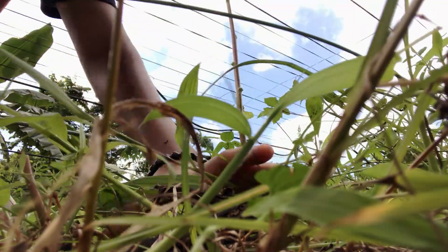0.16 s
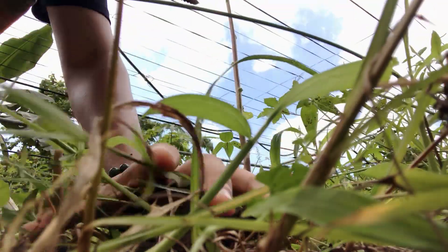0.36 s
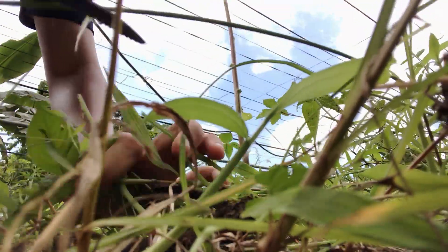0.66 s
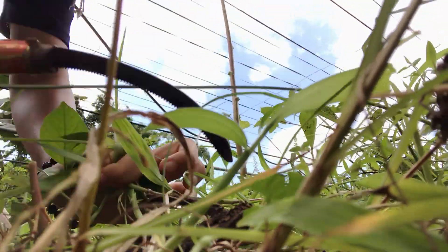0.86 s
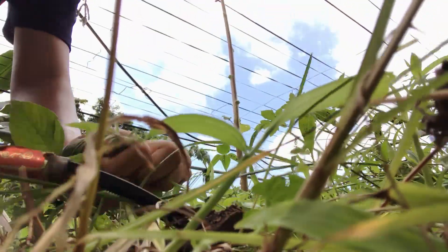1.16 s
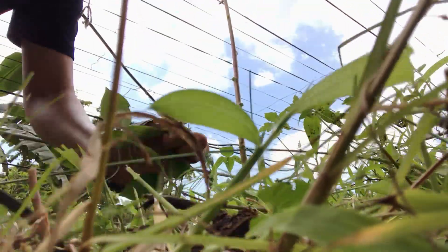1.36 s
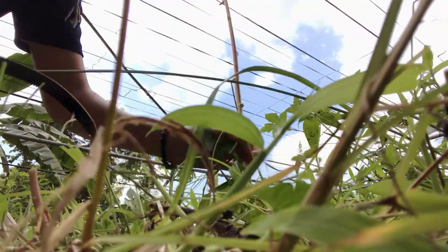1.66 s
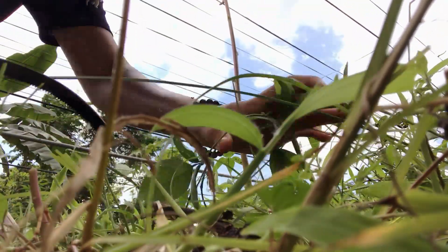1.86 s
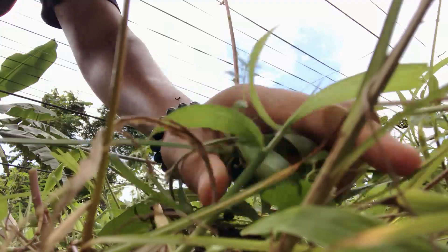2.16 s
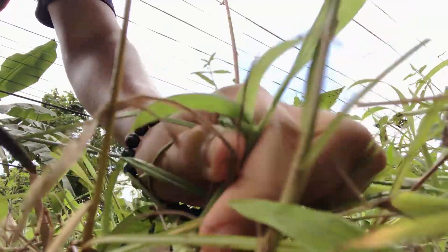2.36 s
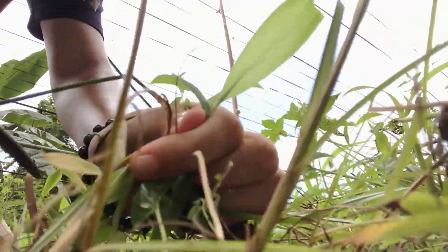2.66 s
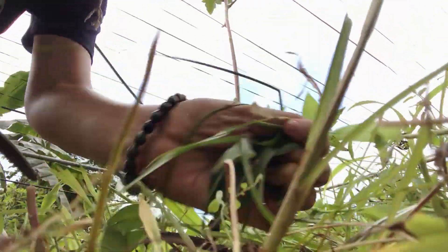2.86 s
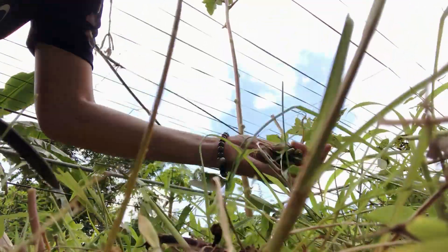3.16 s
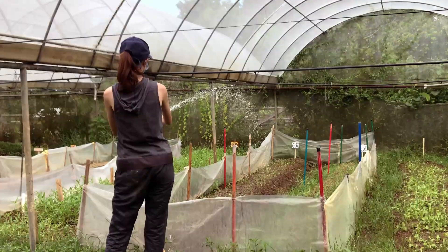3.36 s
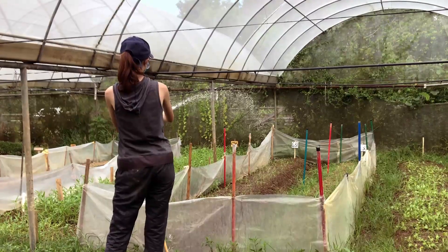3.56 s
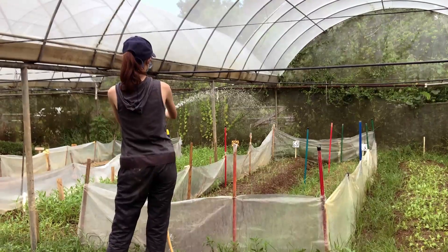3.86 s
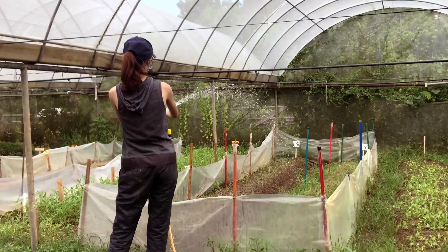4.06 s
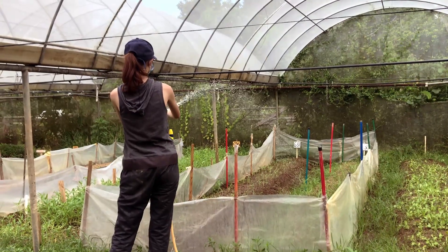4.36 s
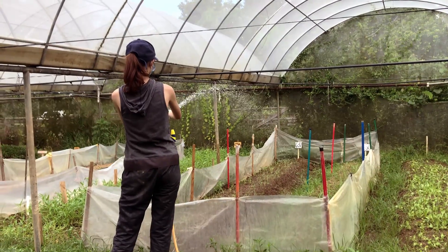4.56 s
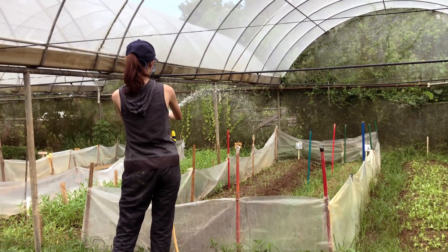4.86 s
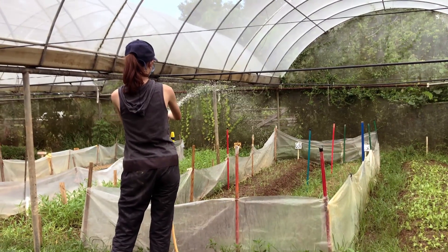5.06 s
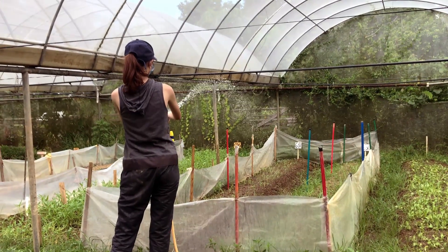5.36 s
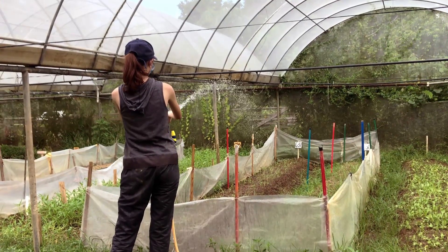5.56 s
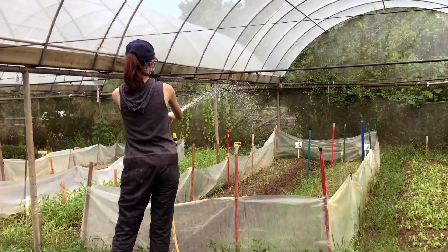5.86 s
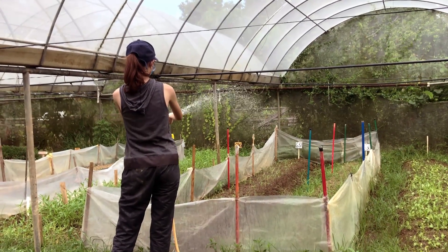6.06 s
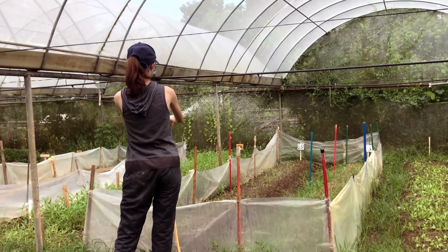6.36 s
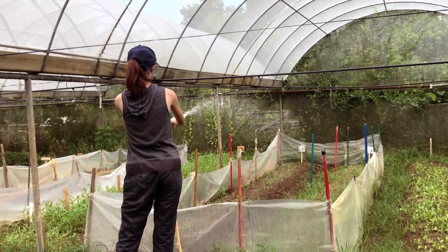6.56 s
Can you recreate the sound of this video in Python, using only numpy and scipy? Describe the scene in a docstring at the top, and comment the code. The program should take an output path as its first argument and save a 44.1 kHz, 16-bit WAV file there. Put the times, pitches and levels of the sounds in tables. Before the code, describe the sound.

A hand pulls weeds right by the microphone, with soft papery rustling, short rips, crisp snaps and a brief blade scrape over a far rumble. An abrupt cut moves to a plastic growing tunnel, where a hose hisses much louder until the end. Drops tick on leaves and sheeting and plop into wet soil, while a motor hums far off and a bird chirps briefly.

```python
"""Leaves rustle close to the ground as a hand gathers, cuts and tears weeds: stalks rip, stems snap,
a sickle scrapes, and insects sizzle faintly over a far rumble. Then the scene cuts, much louder,
to a hose spraying a bed under a plastic tunnel: a patchy hiss, drops ticking on leaves and sheeting,
plops in wet soil, a bird's chirps and the hum of a distant motor. Rustle and spray are noise mixed
with tiny clicks; snaps and drops are cracks with noisy tails; knocks and plops are damped tones."""
import sys
import numpy as np
from scipy import signal
from scipy.fft import rfft, irfft, next_fast_len
from scipy.io import wavfile
from scipy.ndimage import uniform_filter1d, map_coordinates

SR = 44100
rng = np.random.default_rng(int(sys.argv[2]) if len(sys.argv) > 2 else 0)


def waveform_to_disk(signal):
    """Save audio, clipped to [-1, 1], as 16-bit WAV at the path in sys.argv[1]."""
    frames = np.transpose(np.atleast_2d(signal))
    scaled = np.clip(frames, -1, 1) * 32767
    samples = np.round(scaled).astype(np.int16)
    wavfile.write(sys.argv[1], SR, samples)


N = 295911
CUT_S = 3.254  # from the weeds to the hose


def amp(db):
    return 10 ** (np.asarray(db) / 20)


def unit(x):
    return x / np.sqrt(np.mean(x ** 2) + 1e-20)


def curves(rows):
    """Fader moves: one value per sample for each column after the time."""
    times, *columns = np.transpose(rows)
    return [np.interp(np.arange(N) / SR, times, column) for column in columns]


def wobble(rate):
    """A smooth random curve, rate knots a second."""
    return map_coordinates(rng.standard_normal(int(N * rate / SR) + 4), [np.arange(N) * rate / SR])


def coloured(x, spectrum):
    """x through an EQ of (freq_hz, gain_db) points, at rms 1."""
    size = next_fast_len(N + 8192)
    hz, db = np.transpose(spectrum)
    gain = amp(np.interp(np.log(np.fft.rfftfreq(size, 1 / SR) + 1), np.log(hz + 1), db, -120, -120))
    return unit(irfft(rfft(x, size) * gain, size)[:N])


def patchy(x, depth_db, bins, frames):
    """x with patches of random gain in time and frequency."""
    spectra = signal.stft(x, nperseg=256)[2]
    field = uniform_filter1d(rng.standard_normal(spectra.shape), bins, axis=0)
    field = uniform_filter1d(field, frames, axis=1)
    return unit(signal.istft(spectra * amp(depth_db * unit(field)), nperseg=256)[1][:N])


def patter(share, spread_db, patchy_db, clump_db):
    """Patchy noise plus a share of unevenly sized clicks, swelling in clumps."""
    bed = patchy(rng.standard_normal(N), patchy_db, bins=6, frames=8)
    struck = rng.random(N) < .01
    clicks = struck * rng.standard_normal(N) * amp(np.minimum(spread_db * rng.exponential(size=N), 12))
    click_shape = rng.standard_normal(64) * amp(-2 * np.arange(64))
    clicks = signal.fftconvolve(clicks, click_shape)[:N]
    clumps = amp(clump_db * wobble(30))
    clicks = patchy(clicks, 3.5, bins=20, frames=2)
    return clumps * (np.sqrt(1 - share) * bed + np.sqrt(share) * clicks)


def band_levels(peak_db, centre_hz, fall_db, bands_hz):
    """The band nearest the centre gets peak_db; the others lose |fall_db| per octave further out."""
    octaves = np.abs(np.log2(np.asarray(bands_hz) / centre_hz))
    return peak_db - np.abs(fall_db) * (octaves - octaves.min())


def cracks(table, ranges, thump_db, t60_s):
    """Sharp cracks with noisy tails in four bands; a fifth, the ground's thump, follows the first."""
    out, t = np.zeros(N + SR), np.arange(SR // 16) / SR
    bands = [signal.butter(3, edges, "bandpass", fs=SR, output="sos") for edges in ranges]
    middles_hz = np.sqrt(np.prod(ranges[:-1], axis=1))
    for start_s, peak_db, centre_hz, fall_db, tail_db in table:
        crack = rng.standard_normal(len(t)) * amp(-60 * t / .0007)
        noise = rng.standard_normal(len(t))
        fade = amp(np.minimum(tail_db - 3 - 60 * (t - .003) / t60_s, -6))
        peaks_db = band_levels(peak_db, centre_hz, fall_db, middles_hz)
        for band, db in zip(bands, [*peaks_db, peaks_db[0] + thump_db]):
            sharp = signal.sosfilt(band, crack)
            tail = fade * unit(signal.sosfilt(band, noise))
            out[round(start_s * SR):][:len(t)] += amp(db) * (sharp / np.abs(sharp).max() + tail)
    return out[:N]


def rings(table, attack_s):
    """Short damped tones with a soft start."""
    out, t = np.zeros(N + SR), np.arange(SR // 5) / SR
    for start_s, pitch_hz, level_db, t60_s in table:
        envelope = amp(level_db - 60 * t / t60_s) * (1 - np.exp(-t / attack_s))
        out[round(start_s * SR):][:len(t)] += envelope * np.sin(2 * np.pi * pitch_hz * t)
    return out[:N]


# Bands of dragging stems, scraping stalks, leaves and dry blades: centre_hz
PLANT_BANDS = [1000, 3400, 7000, 13000]
def plant_mix(x, gains):
    """x split into four cross-faded bands, each on its own fader."""
    spectrum = rfft(x)
    position = np.interp(np.log(np.fft.rfftfreq(N, 1 / SR) + 1), np.log(PLANT_BANDS), np.arange(4))
    windows = [np.clip(2 - 3 * np.abs(position - k), 0, 1) for k in range(4)]
    return sum(gain * unit(irfft(spectrum * window, N)) for gain, window in zip(gains, windows))


# Faders riding the hand's movement: time_s, leaves_db, stalks_db
HAND_MOVES = [(0.0, -85, -80), (0.16, -76.5, -77), (0.41, -55.5, -62.5), (0.5, -69, -72.5),
              (0.67, -64.5, -70.5), (0.77, -59, -65.5), (1.13, -67, -71.5), (1.18, -64, -70),
              (1.31, -55, -56), (1.38, -47, -50), (1.48, -56, -56), (1.54, -59, -61), (1.66, -58.5, -64.5),
              (1.74, -66.5, -71), (1.86, -71.5, -78), (2.11, -73, -76), (2.3, -65.5, -76),
              (2.46, -58.5, -70.5), (2.56, -58, -67), (2.76, -58.5, -64), (2.92, -61.5, -62.5),
              (3.24, -54.5, -59.5)]
# Bright, papery EQ: freq_hz, gain_db
LEAF_EQ = [(210, -16), (350, -4.5), (385, -9.5), (452, -10.5), (531, -6), (768, -8), (1240, -7),
           (1890, -8.5), (2400, -8), (2600, -7.5), (4940, -5.5), (6290, 4), (10500, -9.5), (15000, -6.5),
           (16200, -18)]
def rustle():
    """Stems, stalks, leaves and dry blades crackle together as the hand moves."""
    leaves_db, stalks_db = curves(HAND_MOVES)
    drag_db = -67.5 + .54 * (stalks_db - stalks_db.mean())  # follows about half the stalks' swing
    crackle = coloured(patter(share=.14, spread_db=2.5, patchy_db=2.2, clump_db=1.1), LEAF_EQ)
    return plant_mix(crackle, amp([drag_db, stalks_db + .5, leaves_db - 2, leaves_db - 3]))


# One narrow, high peak: freq_hz, gain_db
INSECT_EQ = [(6000, -23), (6600, -6), (7000, 20), (7400, -17), (8000, -33)]
def insects():
    """Insects sizzle in a faint, flickering band of noise."""
    return amp(-87 + 1.8 * wobble(23)) * coloured(rng.standard_normal(N), INSECT_EQ)


# Background faders, one for the weeds and one for the tunnel: time_s, level_db
FAR_LEVELS = [
    [(0.0, -68), (1.3, -67), (2.35, -70), (3.24, -64.5)],
    [(3.26, -46.5), (4.3, -45.5), (5.8, -48), (6.2, -46.5), (6.71, -48.5)],
]
# Motor tones as heard in the tunnel: pitch_hz, wander_hz, over_rumble_db
MOTOR_TONES = [(85.7, 4.07, -2.5), (120.2, 3.96, -4.5), (142.8, 1.72, -4), (240, 1.63, -25.5)]
# Low-end EQ: freq_hz, gain_db
RUMBLE_EQ = [(15, -50), (28, -9), (42, -8.5), (70, 1.5), (100, -7.5), (146, -10.5), (155, -25), (180, -11),
             (202, -27), (225, -13.5), (300, -16), (450, -20.5), (600, -50)]
def rumble_and_motor(in_tunnel):
    """Far rumble in both places; the motor's wandering hum stands out only in the tunnel."""
    far_db = np.where(in_tunnel, curves(FAR_LEVELS[1])[0], curves(FAR_LEVELS[0])[0])
    hum = np.zeros(N)
    for pitch_hz, wander_hz, over_rumble_db in MOTOR_TONES:
        gain = amp(over_rumble_db + .54 * wobble(6.8))
        hz = pitch_hz + wander_hz * wobble(8)
        hum += gain * np.sin(2 * np.pi * np.cumsum(hz) / SR)
    rumble = coloured(rng.standard_normal(N), RUMBLE_EQ)
    return amp(far_db) * (rumble + hum * np.where(in_tunnel, 1, amp(-29)))


# Rips and swishes: start_s, length_s, level_db, centre_hz, fall_db_per_octave
TEAR_CUES = [(.31, .065, -58, 7000, 8.5), (.435, 0.016, -64, 4500, 4), (0.534, 0.021, -65.5, 11100, 8),
             (2.273, .035, -65, 7500, 12), (2.323, .025, -61, 7500, 16), (0.386, 0.013, -58, 10000, 4),
             (.665, 0.024, -65.5, 4000, -0.5), (0.826, 0.059, -55.5, 7000, 5.5),
             (1.098, 0.03, -63, 11000, 4), (1.126, 0.028, -52, 3850, 4), (1.163, 0.044, -54, 3400, 8),
             (1.22, 0.017, -62, 4800, 15), (1.26, .034, -61, 6000, 3), (1.292, 0.029, -45.5, 2500, 2.5),
             (1.332, 0.012, -38.5, 3400, 6), (1.366, 0.016, -40, 2000, 0), (1.387, 0.026, -53.5, 1500, 1),
             (1.443, 0.015, -45.5, 3000, 1), (1.461, 0.0078, -33, 3470, 7.5), (1.473, 0.0097, -49, 4500, 5),
             (1.504, 0.06, -55, 4970, 5), (2.408, 0.048, -60, 7500, 10), (2.527, 0.028, -51, 13000, 12),
             (2.602, 0.012, -44.5, 13000, 7), (2.87, 0.0036, -52, 12000, 2.5), (2.9, .074, -50, 9400, 2.5),
             (2.998, 0.02, -57, 5000, 2.5)]
# Gritty midrange EQ: freq_hz, gain_db
TEAR_EQ = [(210, -44), (350, -13), (732, -15.5), (1390, 2), (1890, -5.5), (2860, -3), (4210, -6.5),
           (4490, -8), (5990, -3), (6700, 0), (10500, -14.5), (11800, -8), (16200, -23)]
def tears():
    """Roots and stalks rip, and the hand swishes through leaves, in dense bursts of clicks."""
    bursts = np.zeros((4, N))
    for start_s, length_s, level_db, centre_hz, fall_db in TEAR_CUES:
        progress = np.arange(round(length_s * SR * 1.3)) / (length_s * SR)  # past 1 is the release
        envelope = amp(2 - 4 * progress) * np.clip((1.3 - progress) * 3, 0, 1)
        gains = amp(band_levels(level_db, centre_hz, fall_db, PLANT_BANDS))
        bursts[:, round(start_s * SR):][:, :len(envelope)] += np.outer(gains, envelope)
    grit = coloured(patter(share=.45, spread_db=2, patchy_db=3, clump_db=0), TEAR_EQ)
    return plant_mix(grit, bursts)


# Breaking stems: start_s, peak_db, centre_hz, fall_db_per_octave, relative_tail_db
SNAP_CUES = [(.3252, -47, 8500, 10, -9), (.3954, -46, 9000, 9, -14), (.6699, -51.5, 5000, -3, -11),
             (.8367, -26, 11000, 8, -21), (.8939, -40, 11000, 10, -29), (1.0488, -49, 3000, 1, -22),
             (1.1051, -46, 12000, 5, -11), (1.1287, -35, 3400, 9, -17), (1.1497, -34.5, 5000, 11, -27),
             (1.192, -37, 8000, 5, -23), (1.2014, -40, 4500, 13, -19), (1.2341, -40, 3800, 15, -17),
             (1.2953, -10, 6500, 20.5, -27), (1.3138, -23.5, 12400, 4, -31), (1.3369, -39, 2000, 3, -6),
             (1.3443, -34, 3000, -3, -9), (1.3673, -46, 2000, 0, -16), (1.3743, -23.5, 6530, 3.5, -11.5),
             (1.382, -32, 1350, 9, -23), (1.4021, -27, 6800, 16, -30), (1.4488, -28, 6200, 10, -13),
             (1.4667, -21, 12000, 6, -19.5), (1.5056, -44, 6500, 2.5, -13), (2.1663, -51, 6500, 3.5, -12),
             (2.3427, -44.5, 7500, 29, -14), (2.5381, -36, 12400, 15, -11), (2.5861, -29, 11100, 10, -19),
             (2.6064, -31, 11000, 7.5, -21), (2.6378, -30, 12400, 11, -33), (2.7192, -36, 12400, 14, -25),
             (2.7756, -34, 6050, 3.5, -27), (2.8377, -32.5, 11000, 11, -24), (2.8752, -29, 10000, 14, -38),
             (2.9001, -26, 6500, 3.5, -30), (2.9072, -15.5, 6850, 10, -16), (2.9132, -26, 6540, 24, -28),
             (3.0068, -35.5, 2000, 2.5, -19)]
# Woody, papery, sharp, crisp and thump bands: low_hz, high_hz
SNAP_BANDS = [(800, 2300), (2500, 4600), (5100, 8400), (9800, 15800), (70, 380)]
def snaps():
    """Thick stems break with a dry crack and thump the ground."""
    return cracks(SNAP_CUES, SNAP_BANDS, thump_db=-14.5, t60_s=.017)


# Hollow hits: start_s, pitch_hz, level_db, t60_s
KNOCK_CUES = [(.836, 125, -53, 0.097), (.836, 295, -49.5, 0.043), (1.13, 260, -55, 0.062),
              (1.293, 513, -42, 0.031), (1.366, 1450, -28, 0.023), (1.372, 125, -48, 0.19),
              (1.372, 298, -43.5, 0.036), (2.586, 1500, -35, 0.015), (2.9065, 1310, -12.5, 0.0088),
              (2.9065, 1030, -26, 0.022), (2.9068, 2080, -12, 0.0073), (2.9068, 2700, -25, 0.016),
              (1.4475, 3150, -19.5, 0.013), (2.957, 860, -44, 0.034), (3.10, 422, -52, 0.11),
              (3.13, 420, -54, 0.12)]
def knocks():
    """Stems, tool and ground knock and ring briefly."""
    return rings(KNOCK_CUES, attack_s=.00035)


# One stroke: start_s, length_s, level_db
SICKLE_STROKE = (1.128, 0.082, -59)
# The blade's resonance: freq_hz, gain_db
SICKLE_EQ = [(2100, -38), (2350, -3), (2500, -6), (2700, -8), (3000, -40)]
def sickle():
    """The blade drags along a stalk: grit excites its resonance, fading along the stroke."""
    start_s, length_s, level_db = SICKLE_STROKE
    progress = (np.arange(N) / SR - start_s) / length_s
    stroke = ((progress > 0) & (progress < 1)) * amp(level_db - 4 * np.clip(progress, 0, 1))
    return stroke * coloured(patter(share=.3, spread_db=2, patchy_db=2, clump_db=2), SICKLE_EQ)


# Water faders: time_s, hiss_db, splash_db
SPRAY_LEVELS = [(3.26, -41.5, -46.5), (3.32, -41.5, -46.5), (3.43, -42.5, -45.5), (3.49, -42, -46.5),
                (3.86, -42.5, -48), (4.06, -45.5, -49), (4.35, -46, -47), (4.94, -45, -51.5),
                (5.23, -41.5, -48.5), (5.7, -44, -49.5), (6.03, -42, -49), (6.24, -43, -47.5),
                (6.71, -44, -51)]
# Airy top of the spray: freq_hz, gain_db
HISS_EQ = [(1180, -35), (2000, -3.5), (2760, -7.5), (3500, -3.5), (4210, 0.5), (4840, -3.5), (5470, 0),
           (7630, -3), (8550, -2.5), (10400, -5.5), (12800, -1), (15100, -7), (16200, 0)]
# Wet body of the spray: freq_hz, gain_db
SPLASH_EQ = [(210, -26), (350, -9.5), (560, -3), (1070, -2), (1460, 0), (1710, 0), (1890, -7), (2800, -7.5),
             (3640, -3.5), (6160, -120)]
def hose():
    """Fine spray hisses on leaves under a flickering mist; heavier water splashes on soil."""
    hiss_db, splash_db = curves(SPRAY_LEVELS)
    hiss = coloured(patter(share=.2, spread_db=3, patchy_db=1.3, clump_db=1), HISS_EQ)
    treble = signal.sosfiltfilt(signal.butter(2, 9000, "highpass", fs=SR, output="sos"), hiss)
    mist = amp(-3.5 + .8 * wobble(70)) * unit(treble)  # takes the place of the hiss's own treble
    splash = coloured(patter(share=.077, spread_db=1, patchy_db=1.5, clump_db=1.14), SPLASH_EQ)
    return amp(hiss_db) * (hiss - treble + mist) + amp(splash_db) * splash


# Big, close drops: start_s, peak_db, centre_hz, fall_db_per_octave, relative_tail_db
DROP_CUES = [(3.349, -24.5, 6730, 6, -22), (3.4058, -21, 10800, 14, -13), (3.5094, -24.5, 10000, 6, -19),
             (3.5581, -12.5, 7140, 17, -20), (3.8364, -26, 4300, 11, -12), (3.849, -26, 7000, 23, -21),
             (3.8831, -23.5, 7000, 16, -19), (3.9099, -21, 5500, 9, -16.5), (3.9819, -23, 7500, 14, -30),
             (4.5159, -24, 6700, 20, -20), (4.6008, -31.5, 5860, 11, -9.5), (4.7241, -25, 12400, 16, -21),
             (4.8127, -20.5, 9400, 14, -19), (4.8979, -28, 11500, 12, -14), (5.2047, -31, 11500, 14, -13),
             (5.424, -28, 12400, 12, -22), (5.5205, -29, 12400, 14, -20), (5.585, -26, 12400, 9, -12),
             (4.9449, -24, 11000, 13, -22), (4.9615, -23.5, 7000, 7.5, -12), (4.9797, -23.5, 7000, 11, -37),
             (5.0716, -20, 5340, 16, -13), (5.109, -24, 7500, 14, -30), (5.159, -26, 9100, 21, -9.5),
             (5.1786, -24, 7500, 24, -22), (5.2194, -24, 6200, 22, -27), (5.3166, -22, 7000, 6, -13.5),
             (5.3998, -23.5, 6200, 22, -36), (5.46, -20.5, 11000, 13, -22),
             (5.6144, -24.5, 8550, 29, -17.5), (5.7597, -23, 6300, 21, -25), (5.7965, -19, 4430, 11.5, -14),
             (5.8393, -22.5, 11000, 5, -26), (5.9423, -21, 4300, 24, -14), (6.0472, -22.5, 7500, 23, -17),
             (6.3879, -22, 6000, 6, -16), (6.4044, -20.5, 5800, 20, -20), (6.4593, -20.5, 5600, 32, -31),
             (6.6544, -21, 7000, 20, -31)]
# Dull, wet, sharp, crisp and thump bands: low_hz, high_hz
DROP_BANDS = [(900, 2300), (3200, 5000), (5000, 9000), (9800, 15800), (70, 380)]
def drops():
    """Single drops tick on leaves and sheeting: big ones on cue, small ones at random."""
    small = [(CUT_S + when * (N / SR - CUT_S), -28 - 7 * softer, 9400 * 2 ** (1.7 * (pitch - .5)),
              20, -18.5) for when, softer, pitch in rng.random((50, 3))]
    return cracks(DROP_CUES + small, DROP_BANDS, thump_db=-24, t60_s=.042)


# Bird notes: start_s, length_s, first_hz, last_hz, level_db
CHIRP_CUES = [(4.238, .051, 3300, 3300, -48.5), (5.386, 0.037, 2437, 2450, -48.5),
              (6.185, 0.034, 5150, 5250, -48), (6.075, 0.078, 2320, 2570, -47),
              (6.078, 0.038, 4820, 4580, -43), (6.13, 0.054, 3700, 3770, -44),
              (6.158, 0.074, 2355, 2630, -42), (6.168, .03, 5000, 4600, -44),
              (6.212, .066, 3830, 3960, -48), (6.245, 0.06, 2550, 2500, -46.5),
              (6.265, .026, 3240, 3240, -44), (6.275, 0.089, 2440, 1920, -51)]
def bird():
    """Gliding, hoarse whistles, blurred by echoes from the tunnel."""
    notes = np.zeros(N)
    flutter, quaver_hz = 1 + .7 * wobble(450), 50 * wobble(200)
    for start_s, length_s, first_hz, last_hz, level_db in CHIRP_CUES:
        at = round(start_s * SR) + np.arange(round(length_s * SR))
        hz = np.linspace(first_hz, last_hz, len(at)) + quaver_hz[at]
        envelope = amp(level_db) * flutter[at] * np.sqrt(np.hanning(len(at)))
        notes[at] += envelope * np.sin(2 * np.pi * np.cumsum(hz) / SR)
    t = np.arange(SR // 4) / SR
    echoes = rng.standard_normal(len(t)) * amp(-60 * t / .19)  # 0.19 s reverb
    return notes + amp(-3) * signal.fftconvolve(notes, echoes / np.linalg.norm(echoes))[:N]


# Round, wet notes: start_s, pitch_hz, level_db, t60_s
PLOP_CUES = [(4.412, 946, -29, 0.044), (4.416, 1350, -22, 0.021), (5.216, 1030, -33, 0.054),
             (5.855, 1360, -26, 0.021)]
def plops():
    """Water plops into wet soil with a soft attack."""
    return rings(PLOP_CUES, attack_s=.0042)


def scene():
    """A hard cut from weeding to watering, over the distant background, in mono."""
    in_tunnel = np.arange(N) >= CUT_S * SR
    weeding = rustle() + insects() + tears() + snaps() + knocks() + sickle()
    watering = hose() + drops() + bird() + plops()
    return (np.where(in_tunnel, watering, weeding) + rumble_and_motor(in_tunnel))[None]


def record(dry):
    """A brick-wall low-pass trims the very top."""
    passband = np.fft.rfftfreq(2 * N, 1 / SR) < 15900
    return irfft(rfft(dry, 2 * N) * passband, 2 * N)[:, :N]


dry = scene()
out = record(dry)
waveform_to_disk(out)
```